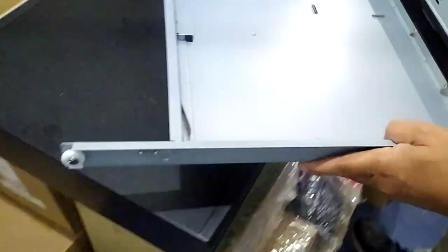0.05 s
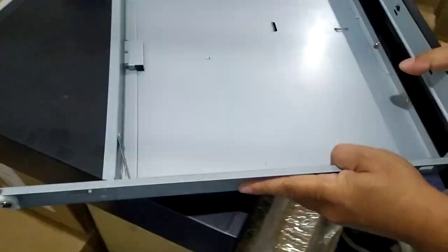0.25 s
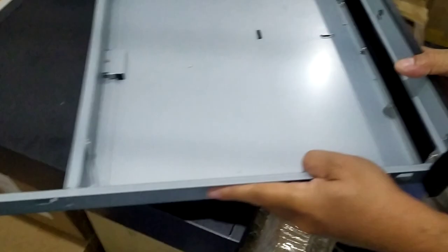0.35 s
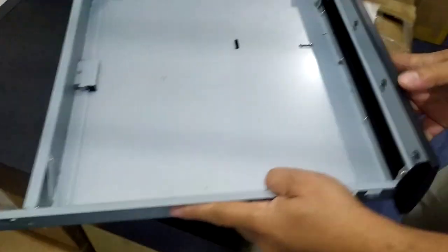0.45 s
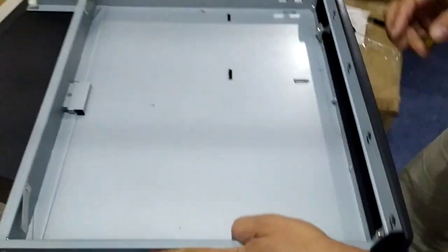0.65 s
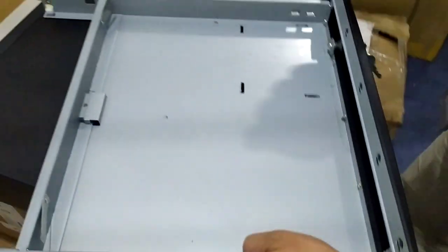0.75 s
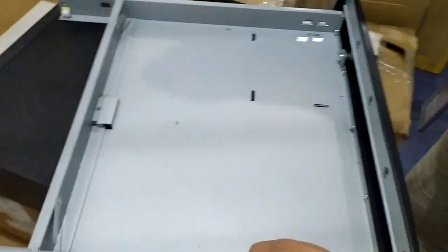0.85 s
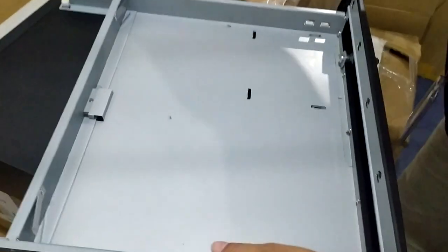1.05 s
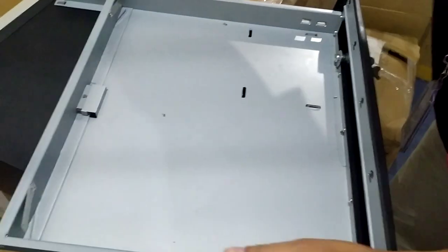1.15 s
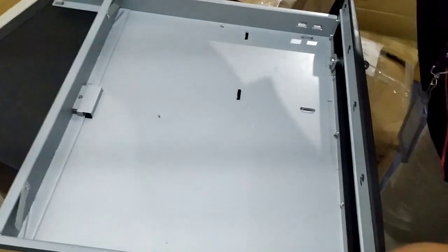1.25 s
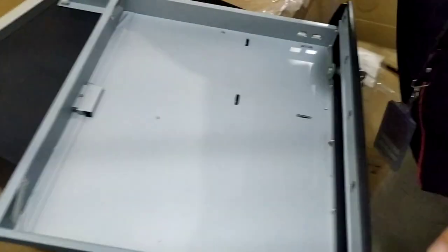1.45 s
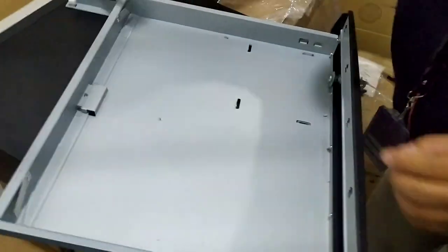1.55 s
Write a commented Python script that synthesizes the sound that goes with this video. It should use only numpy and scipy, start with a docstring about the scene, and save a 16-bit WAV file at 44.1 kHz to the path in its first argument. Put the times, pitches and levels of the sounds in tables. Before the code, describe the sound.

Close up in a small room among cardboard, a sheet-metal tray drags and rumbles, lands in a loud double clang, ticks as it shifts, clashes down once more, and finally a hand lightly brushes its rim.

```python
"""A sheet-steel cash drawer is slid over its case and set down in a small storeroom, close to the microphone.
It scrapes, touches down, lands with a clang and rebounds, then shifts and drops again with a bright clash;
last, a hand brushes along the rim. Loose fittings tick throughout, over handling rumble and faint air.
Decaying sine modes make the booms and rings; coloured noise under envelopes makes the clatter and scraping."""
import sys
import numpy as np
from scipy import signal
from scipy.fft import rfft, irfft
from scipy.io import wavfile

SR = 44100
rng = np.random.default_rng(int(sys.argv[2]) if len(sys.argv) > 2 else 0)


def materialize(psi):
    """Save the field psi as 16-bit PCM at rate SR to the path in sys.argv[1].

    A 1-D psi becomes a single channel; in a 2-D psi each row is a channel.
    """
    bounded = np.clip(np.atleast_2d(psi).T, -1, 1)
    quanta = np.round(bounded * 32767).astype(np.int16)
    wavfile.write(sys.argv[1], SR, quanta)


N = 70560

# tray touches down, lands, rebounds, drops again: (time [s], floor level [dB], wall level [dB],
# support thud level [dB], clang level [dB], clash level [dB], clash hold [s])
LANDINGS = [(.404, -35.5, -47.5, -38, -52, -57, .002), (.4286, -16, -27, -22, -22, -24, 0.015),
            (.4575, -21.5, -37, -41, -42, -33.5, 0.02), (0.9277, -25, -48.5, -21, -43, -28.5, 0.028)]
CONTACT_S = 0.0014  # rise time of walls, clang and clash


def undb(db):
    """Amplitude gain from dB."""
    return 10 ** (np.asarray(db) / 20)


def spectrum(points):
    """Gain of every frequency bin from (frequency [Hz], level [dB]) points, over log frequency."""
    points_hz, points_db = np.array(points, float).T
    bins_hz = np.arange(N // 2 + 1) * SR / N
    return undb(np.interp(np.log(bins_hz + 1), np.log(points_hz), points_db))


def curve(rows, axis=1):
    """Gain over time from one dB column of a table."""
    rows = np.array(rows, float)
    return undb(np.interp(np.arange(N) / SR, rows[:, 0], rows[:, axis]))


def noise(points):
    """Stereo noise of rms 1 with the given colour; the bass is nearly alike in both channels."""
    # stereo width: (frequency [Hz], side over mid [dB])
    side_over_mid = [(60, -15.5), (200, -18.5), (380, -5), (700, -5), (1300, 3), (2400, -1), (4400, 0),
                     (8000, -1), (16000, -0.5)]
    mid, side = rfft(rng.standard_normal((2, N)))
    width = spectrum(side_over_mid)
    channels = np.array([mid + width * side, mid - width * side])
    x = irfft(channels * spectrum(points) / np.hypot(1, width), N)
    return x / x.std()


def grain(rate_hz, depth_db):
    """Uneven contact: gain of rms 1 running between random dB values, rate_hz of them a second."""
    knots = rng.standard_normal(N)
    gain = undb(depth_db * np.interp(np.arange(N) * rate_hz / SR, np.arange(N), knots))
    return gain / np.sqrt(np.mean(gain ** 2))


def fade(start_s, t60_s, attack_s, hold_s=0):
    """Envelope of a blow: fast rise, hold, exponential decay."""
    age_s = np.maximum(np.arange(N) / SR - start_s, 0)
    rise = 1 - np.exp(-age_s / attack_s)
    return rise * np.exp(-np.log(1000) * np.maximum(age_s - hold_s, 0) / t60_s)


def ring(modes, start_s, attack_s, spread_rad):
    """Decaying sine modes; each reaches the two channels a little out of step."""
    age_s, out = np.arange(N) / SR - start_s, 0
    for hz, db, t60_s in modes:
        skew = spread_rad * rng.choice([-1, 1]) * np.array([[1], [-1]])
        out = out + undb(db) * fade(start_s, t60_s, attack_s) * np.sin(2 * np.pi * hz * age_s + skew)
    return out


def treble_ripple():
    """An uneven random gain over frequency, strongest in the treble, shared by the metallic noises."""
    ripple_db, spacing_hz = 4.0, 60
    knots = np.clip(rng.standard_normal(N), -2, 1.5)
    hz = np.arange(N // 2 + 1) * SR / N
    depth_db = ripple_db * np.minimum(hz / 6000, 1)  # full depth from 6 kHz up
    gain = undb(depth_db * np.interp(hz / spacing_hz, np.arange(N), knots))
    return gain / np.sqrt(np.mean(gain ** 2))


def metallic(points, ripple):
    """Metallic noise: noise of the given colour with the uneven gain over frequency."""
    return irfft(rfft(noise(points)) * ripple, N)


def clatter(ripple):
    """The tray lands: a hard clang and a longer, brighter clash begin together, the top dying first."""
    # metallic noise of clang and clash: (frequency [Hz], level [dB per Hz])
    clang_colour = [(100, -14), (280, -2.5), (550, -13), (730, -4), (900, -13.5), (1350, 1.5), (2000, -7.5),
                    (3000, -9), (5000, -26.5), (16000, -21.5)]
    clash_colour = [(300, -1.5), (1000, -0.5), (2500, -2.5), (4000, -2.5), (6000, -2.5), (8000, -1),
                    (11000, -1), (13000, -6.5), (16000, -8.5)]
    clang_t60_s, snap_t60_s, snap_db = 0.17, 0.046, 5.5
    clash_t60_s, top_damping = 0.29, 0.21
    out = 0
    for s, *_, clang_db, clash_db, hold_s in LANDINGS:
        hard = metallic(clang_colour, ripple)
        snap = undb(snap_db) * hard.mean(0) * fade(s, snap_t60_s, CONTACT_S)  # alike in both channels
        clang = hard * fade(s, clang_t60_s, CONTACT_S) + snap

        bright = metallic(clash_colour, ripple)
        top = irfft(rfft(bright) * spectrum([(4000, -19), (9000, 1), (13000, 10)]), N)
        clash = (bright - top) * fade(s, clash_t60_s, CONTACT_S, hold_s)
        clash = clash + top * fade(s, clash_t60_s / (1 + top_damping), CONTACT_S, hold_s)

        out = out + (undb(clang_db) * clang + undb(clash_db) * clash) * grain(700, 1)
    return out


def booms():
    """The tray lands: modes of its floor, its walls and the support ring on; the walls waver."""
    # modes of tray floor, tray walls and support: (frequency [Hz], level [dB], t60 [s])
    floor_modes = [(276.1, -0.5, 0.21), (253.6, -5, 0.22), (329, -8, 0.22), (382.3, -12.5, 0.31),
                   (410, -11.5, 0.16), (461.3, -12.5, 0.32)]
    wall_modes = [(689, -1, 0.25), (744.5, 3.5, 0.28), (1032, -9.5, 0.4), (1160, 2, 0.23),
                  (1203, 2.5, 0.17), (1258, -1, 0.28), (1429, -1.5, 0.14), (1470, -2, .18), (1559, 2, 0.17),
                  (1687, -7, .17), (1750, -6, 0.14), (1970, -12.5, 0.24), (2230, -15, .18),
                  (2690, -7, 0.25), (3381, -12, 0.25)]
    thud_modes = [(241.4, 7, 0.06), (197, -7, 0.3), (161.8, -16, 0.36), (130.1, -24.5, 0.66),
                  (358, -8.5, 0.033), (695, -11.5, .12), (1050, -13.5, 0.16)]
    out = 0
    for s, floor_db, wall_db, thud_db, *_ in LANDINGS:
        floor = undb(floor_db) * ring(floor_modes, s, 0.0034, 0.14)
        thud = undb(thud_db) * ring(thud_modes, s, 0.0042, 0.08)
        walls = undb(wall_db) * ring(wall_modes, s, CONTACT_S, 0.37) * grain(120, 3)
        out = out + floor + thud + walls
    return out


def ticks(ripple):
    """Rails and loose fittings knock and ring briefly: three metallic noise bands plus modes."""
    # light metal contacts: (time [s], level at 1.5 kHz [dB], level at 4.5 kHz [dB],
    # level at 10 kHz [dB], noise t60 [s], rail ring level [dB], fitting ring level [dB])
    contacts = [(0.0148, -35, -35.5, -52, .08, -41, -43.5), (0.3984, -35, -36, -33, 0.056, -45.5, -37),
                (0.418, -35, -32, -29, 0.19, -56, -36), (0.566, -44, -45, -38.5, 0.16, -68, -50),
                (.62, -47, -67, -46.5, 0.29, -68, -67), (.637, -45, -57, -32.5, 0.045, -63, -62),
                (.678, -40.5, -52, -40.5, 0.099, -62, -58), (0.6896, -35.5, -48, -50, 0.073, -40.5, -69),
                (0.697, -33, -64, -63, 0.065, -49.5, -63), (.852, -56, -75, -66, 0.045, -58, -72),
                (0.9228, -36.5, -35, -26, 0.16, -67, -42), (1.0527, -47, -44, -40, 0.069, -73, -54),
                (1.1205, -51.5, -49, -52, 0.16, -57.5, -64), (1.155, -55, -55, -54, 0.14, -60, -73),
                (1.5, -73, -53, -62, 0.2, -66, -68)]
    # modes of side rails and small steel fittings: (frequency [Hz], level [dB], t60 [s])
    rail_modes = [(970, 0.5, 0.089), (1630, -1.5, 0.078), (1656, 4.5, 0.055), (2240, -3, 0.074),
                  (4290, -7.5, 0.11)]
    fitting_modes = [(2620, -1, 0.091), (3020, -9, 0.12), (5010, 2, 0.11), (8200, 0, 0.057),
                     (8500, -11, .06), (10970, -7, 0.041), (10900, -2.5, 0.059), (13100, -10, .05)]
    low_colour = [(200, -23), (700, -3.5), (1000, -3), (1700, -2), (2800, -5.5), (5000, -18), (16000, -59)]
    mid_colour = [(1000, -45), (3000, -6), (4500, -5), (6000, -5), (9000, -5), (16000, -47)]
    high_colour = [(3000, -43), (6000, -7.5), (8000, -1.5), (11000, -1.5), (13000, -8.5), (16000, -9)]
    out = 0
    for s, low_db, mid_db, high_db, t60_s, rail_db, fitting_db in contacts:
        knock = undb(low_db) * metallic(low_colour, ripple)
        knock = knock + undb(mid_db) * metallic(mid_colour, ripple)
        knock = knock + undb(high_db) * metallic(high_colour, ripple)
        rails = undb(rail_db) * ring(rail_modes, s, 0.00064, 0.36)
        fittings = undb(fitting_db) * ring(fitting_modes, s, 0.00024, 0.96)
        out = out + knock * fade(s, t60_s, 0.00046) + rails + fittings
    return out * grain(900, -2.5)


def sliding(ripple):
    """Steel drags unevenly over the case; later a hand brushes the rim: noise with rough gains."""
    # sliding: (time [s], scrape level [dB], hiss level [dB])
    slide_levels = [(0, -76, -46.5), (.06, -52.5, -43.5), (.11, -34, -43), (.19, -34.5, -45.5),
                    (.3, -40.5, -46.5), (.39, -47, -43.5), (.5, -38, -45.5), (.66, -49.5, -46),
                    (.74, -44.5, -54), (.82, -52, -54.5), (.9, -57, -57), (1.1, -55, -68), (1.25, -57, -63),
                    (1.6, -66, -64)]
    # hand along the rim: (time [s], level [dB])
    brush_levels = [(1.385, -60.5), (1.397, -49.5), (1.43, -47.5), (1.458, -51), (1.48, -56.5),
                    (1.6, -62.5)]
    # colours: (frequency [Hz], level [dB])
    scrape_colour = [(100, 17), (260, -5), (400, -1), (600, 4.5), (850, 4), (1300, -4.5), (2600, -9),
                     (5000, -20), (16000, -68)]
    hiss_colour = [(500, 2.5), (1500, -2), (2700, 0), (5000, -1), (6300, -5), (7500, -3), (8200, -1.5),
                   (8800, -3.5), (11000, -9.5), (16000, -18.5)]
    brush_colour = [(400, 2), (1500, -5.5), (3000, -7), (5000, -5.5), (8500, -2), (12000, -6), (16000, -10)]
    scrape = noise(scrape_colour) * curve(slide_levels, axis=1) * grain(160, 1.1)
    hiss = metallic(hiss_colour, ripple) * curve(slide_levels, axis=2) * grain(400, 0.82)
    brush = metallic(brush_colour, ripple) * curve(brush_levels) * grain(250, 1.3)
    return scrape + hiss + brush


def handling():
    """The moving tray rumbles and its floor drones (noise); it bumps softly on the case (modes)."""
    # handling: (time [s], rumble level [dB], drone level [dB])
    handling_levels = [(0, -47, -71), (.09, -53, -42), (.13, -49, -56), (.25, -44.5, -46),
                       (.34, -46.5, -58), (.42, -54, -69), (.46, -39, -37), (.56, -51, -38.5),
                       (.66, -48, -49), (.78, -48.5, -41), (.87, -58.5, -50), (1.03, -38.5, -49.5),
                       (1.17, -50, -49.5), (1.3, -47.5, -55), (1.42, -53, -54), (1.53, -51.5, -55.5),
                       (1.6, -55, -49)]
    # colours: (frequency [Hz], level [dB])
    rumble_colour = [(20, -36), (35, -20), (46, 1), (64, -2), (85, -13), (140, -14), (200, -17.5),
                     (400, -24), (1500, -58)]
    drone_colour = [(80, -53), (150, -6.5), (230, -2.5), (275, 0), (320, -7.5), (400, -13.5), (435, -15.5),
                    (468, -5.5), (510, -23.5), (600, -59), (2000, -58)]
    # soft bumps of the tray against the case: (time [s], level [dB])
    bump_levels = [(0.119, -40), (0.179, -39), (0.228, -34), (0.291, -41), (0.441, -41), (.492, -36.5)]
    # modes of the case: (frequency [Hz], level [dB], t60 [s])
    case_modes = [(62.8, 1, 0.17), (51, -13, .16), (150.5, -6.5, 0.22)]
    bumps = sum(undb(db) * ring(case_modes, s, 0.0053, 0.1) for s, db in bump_levels)
    rumble = noise(rumble_colour) * curve(handling_levels, axis=1)
    drone = noise(drone_colour) * curve(handling_levels, axis=2)
    return bumps + rumble + drone


def room(x):
    """Diffuse tail of a small room, damped by cardboard: convolution with decaying noise."""
    t60_s, build_s = 0.39, 0.013
    colour = [(60, 0), (300, -2), (800, 1.5), (8000, -3), (16000, -2.5)]
    tail = noise(colour) * fade(0, t60_s, build_s)
    tail /= np.sqrt(np.sum(tail ** 2) / 2)  # unit energy per channel on average
    return signal.fftconvolve(x, tail, axes=1)[:, :N]


def air():
    """Steady background: coloured noise."""
    # colour: (frequency [Hz], level [dB])
    air_colour = [(60, 0.5), (300, -10), (600, -3.5), (1500, -4.5), (4000, -14.5), (10000, -35),
                  (16000, -45)]
    return undb(-60) * noise(air_colour)


def scene():
    """The metallic noises share one uneven gain; clatter and ticks carry into the small room."""
    clatter_send_db, tick_send_db = -8.5, -5
    ripple = treble_ripple()
    heavy, light = clatter(ripple), ticks(ripple)
    echo = room(undb(clatter_send_db) * heavy + undb(tick_send_db) * light)
    return booms() + heavy + light + echo + sliding(ripple) + handling() + air()


def record(dry):
    """Cut the deepest bass with a zero-phase slope and the top with a steep elliptic low-pass."""
    low_cut_hz, top_hz = 40, 16000
    hz = np.arange(N + 1) * SR / (2 * N)
    high_pass = 1 - 1 / (1 + (hz / low_cut_hz) ** 8)
    thin = irfft(rfft(dry, 2 * N) * high_pass)[:, :N]  # zero-padded against wrap-around
    return signal.sosfilt(signal.ellip(10, 0.2, 80, top_hz, fs=SR, output="sos"), thin)


dry = scene()
out = record(dry)
materialize(out)
```